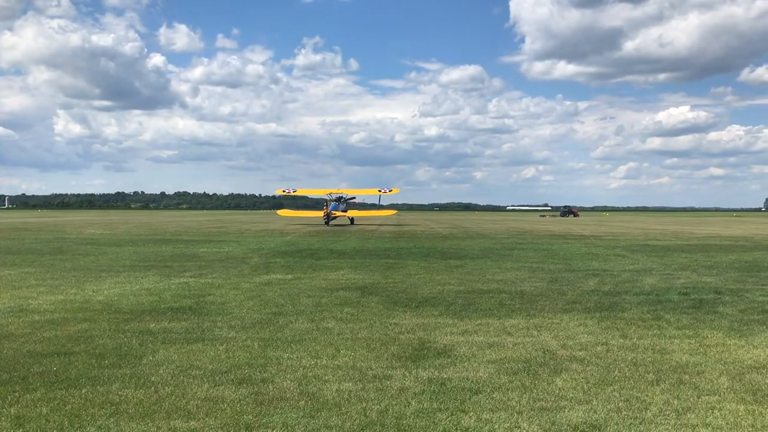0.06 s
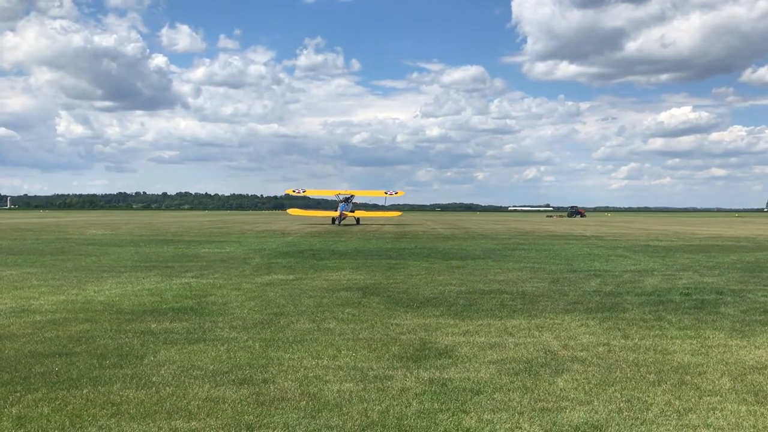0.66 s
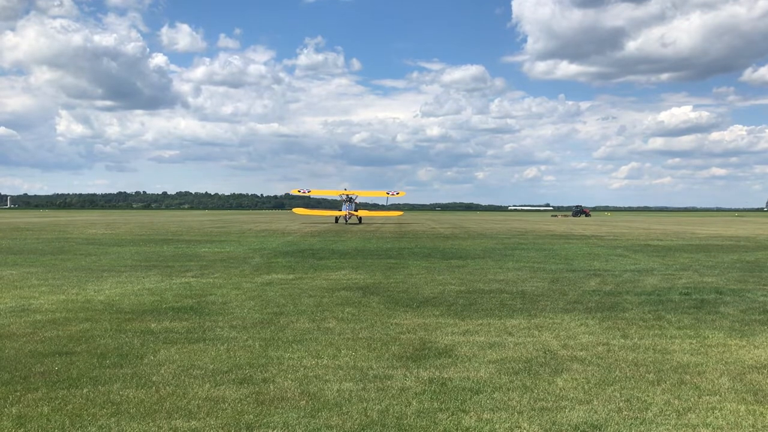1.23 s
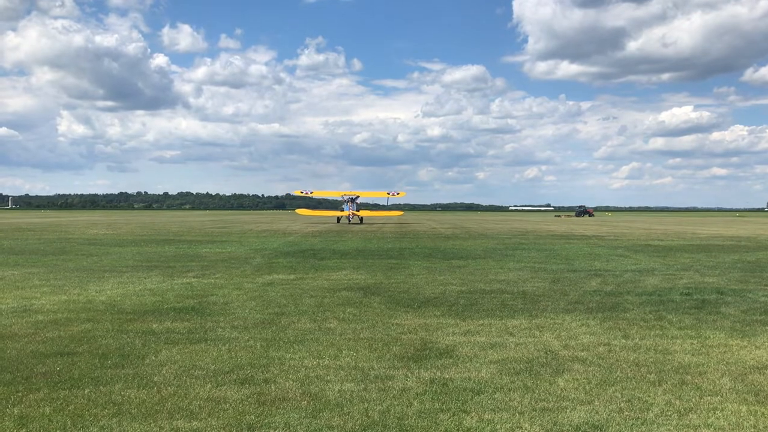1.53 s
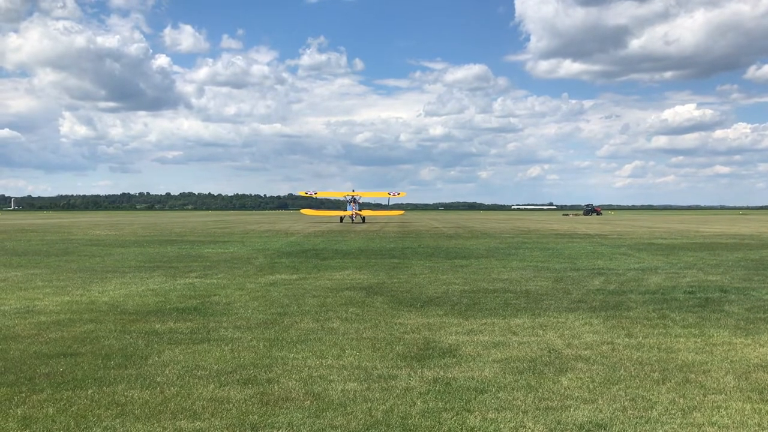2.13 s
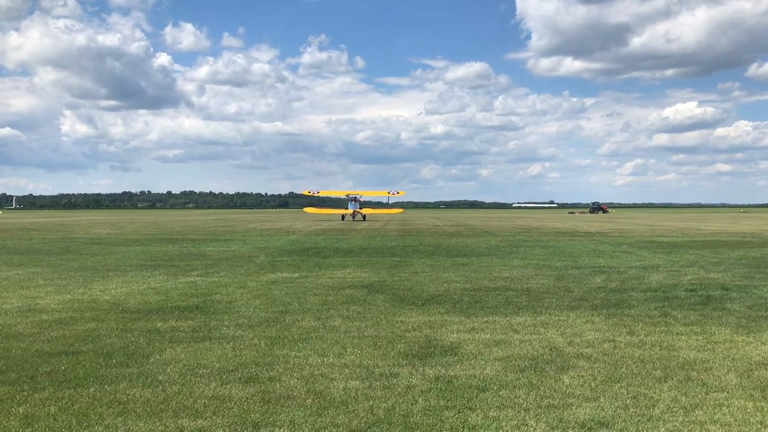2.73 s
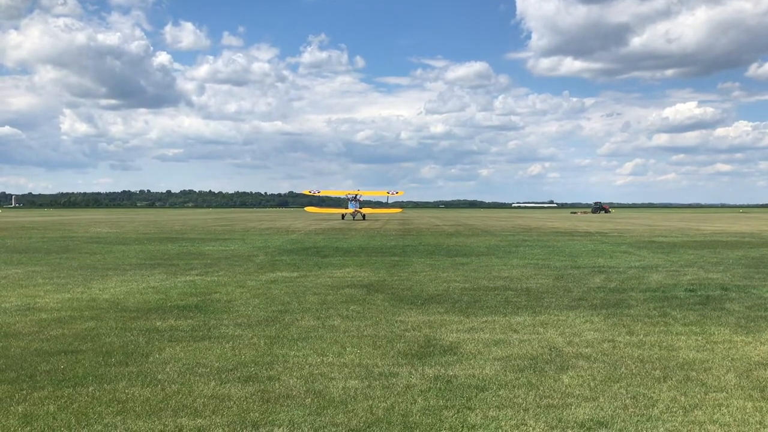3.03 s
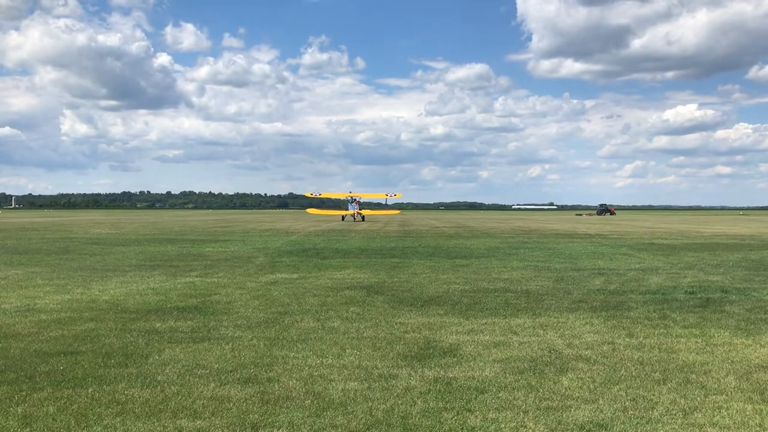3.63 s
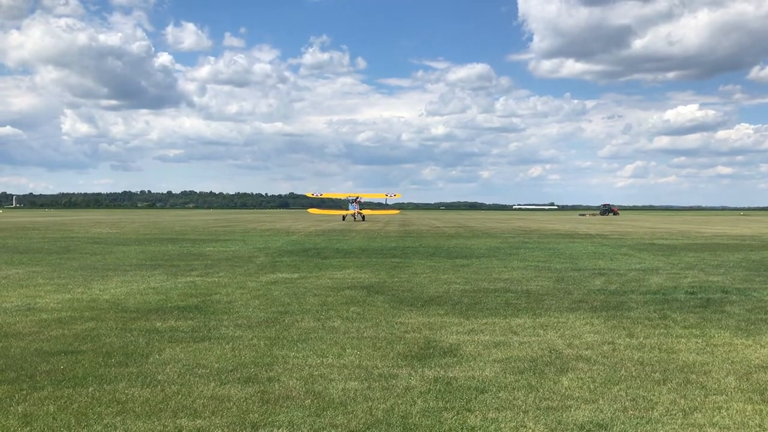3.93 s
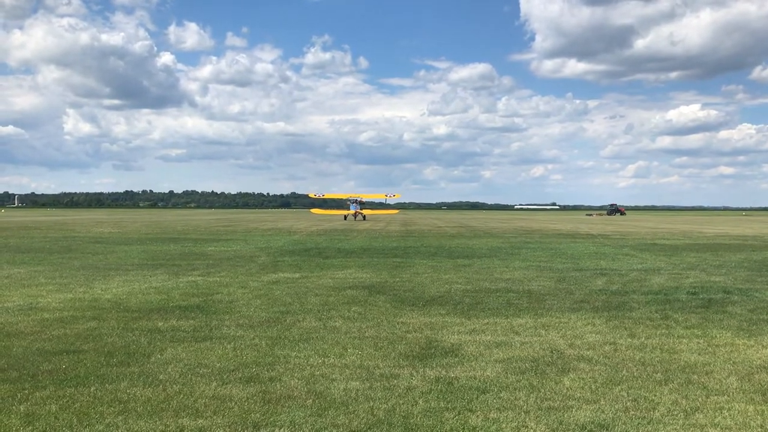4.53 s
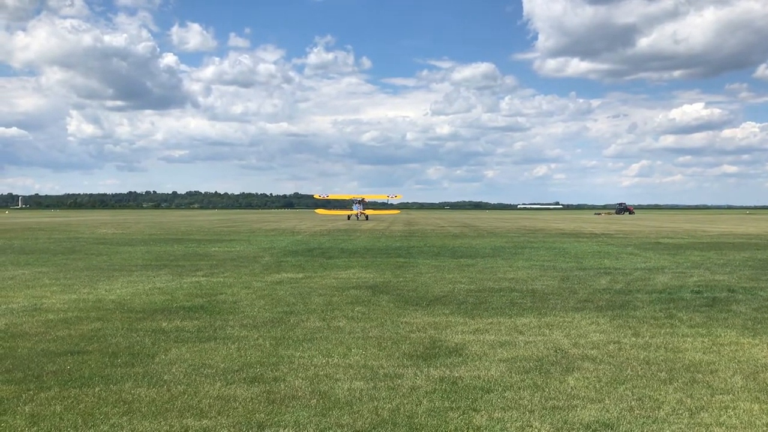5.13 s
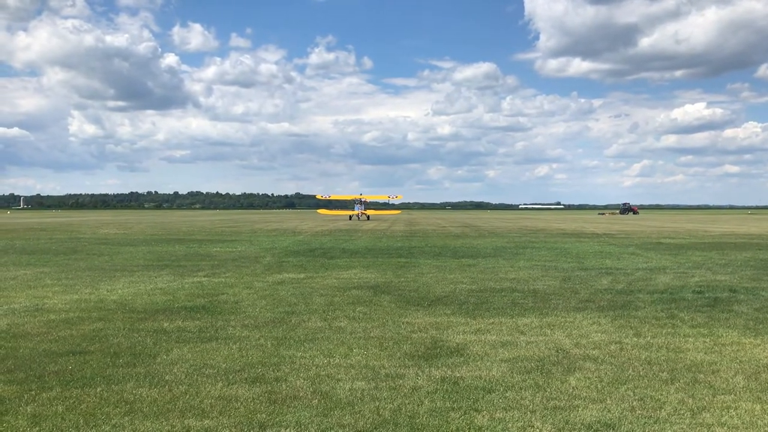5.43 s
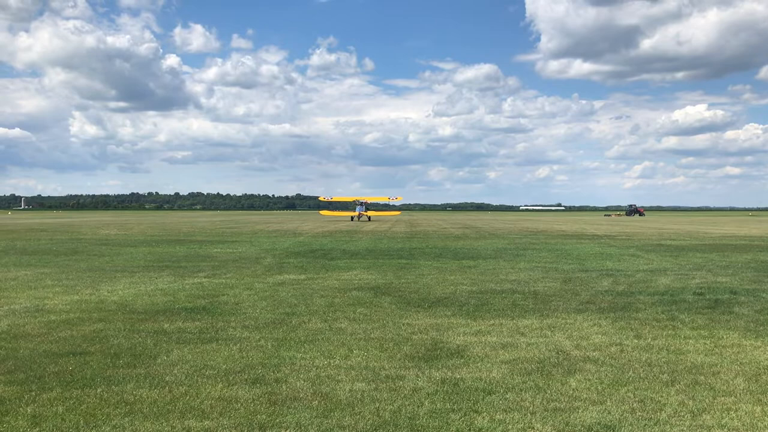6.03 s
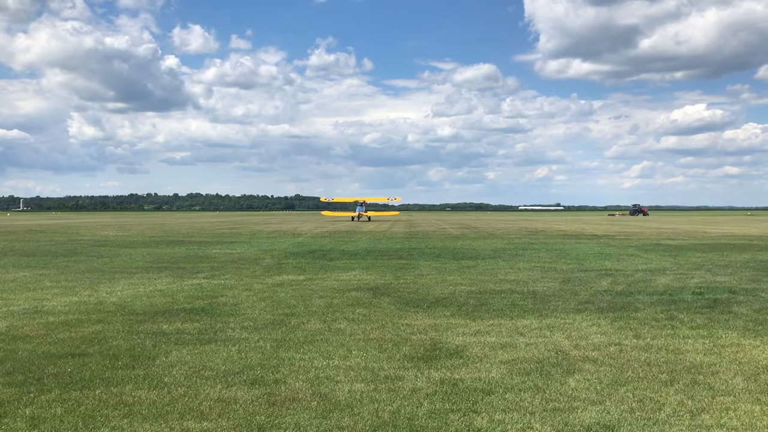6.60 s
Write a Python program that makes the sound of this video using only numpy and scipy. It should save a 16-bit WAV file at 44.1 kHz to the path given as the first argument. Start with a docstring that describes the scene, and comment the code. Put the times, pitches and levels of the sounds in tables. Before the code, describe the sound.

Gusty wind buffets the microphone throughout on an open grass airfield, shifting between low rumble, thumps and brief tearing flaps. Beneath it a distant biplane taxis at low power, its radial engine chuffing rapidly and unevenly with a low drone and propeller swish. A faint hollow wind note sinks and fades early on. Around the middle, the engine's rasp briefly swells and sweeps downward, then the engine slows slightly and dulls.

```python
"""Gusty wind buffets the microphone, over faint grass hiss and an early hollow note.
Under it a biplane taxis far off, its seven-cylinder radial ticking over near 1000 rpm.
Each cylinder chuffs with its own strength and pipe ring; now and then a hard burn cracks.
The propeller tips swish and the firing rate drones. Eddies sweeping the microphone port
cover most of the engine's bass."""
import sys
import numpy as np
from scipy import signal
from scipy.fft import rfft, irfft, next_fast_len
from scipy.io import wavfile
from scipy.ndimage import uniform_filter1d, minimum_filter1d

SR = 44100
rng = np.random.default_rng(int(sys.argv[2]) if len(sys.argv) > 2 else 0)


def bounce(signal):
    """Save signal as a 16-bit WAV file at the path given by the first command-line argument."""
    frames = np.transpose(np.atleast_2d(signal))
    limited = np.clip(frames, -1, 1)
    pcm = np.round(limited * 32767).astype(np.int16)
    wavfile.write(sys.argv[1], SR, pcm)


N = 302746
TIME_S = np.arange(N) / SR

# wind between gusts, eddy rate growing with speed: time_s, base_eddy_hz, rumble_db
BREEZE = [(0.0, 194, 3.5), (0.5, 237, -8.5), (0.97, 195, -9.5), (1.25, 201, 3.2), (1.65, 180, -6),
          (1.75, 133, 3), (2.2, 99, -0.8), (2.5, 121, 0.8), (2.92, 259, 1.8), (3.02, 149.0, -5.7),
          (3.3, 140, 5.5), (3.7, 142, 2), (4.27, 161.0, -3.8), (4.45, 60, 3.5), (4.66, 99, 3),
          (4.9, 179, 2.5), (6.3, 161.0, 1.8), (6.86, 266, -1.3)]
# gusts on top of the breeze: start_s, length_s, added_eddy_hz, added_rumble_db
GUSTS = [(-.015, 0.11, 382, -6), (0.168, 0.037, 99, 1), (.23, .077, 36, 2.5), (0.323, 0.05, 165, 5),
         (0.574, .12, 613, 5), (0.734, 0.018, 137, 3.5), (0.799, 0.15, 157, 6.5), (1.12, 0.029, 250, -1.5),
         (1.176, .02, 140, -6), (1.297, 0.16, 215, -0.5), (1.506, 0.14, 128, 2), (1.768, 0.031, 45, -5),
         (1.841, 0.048, 53, -2), (2.257, 0.15, 89.5, 1.8), (2.656, 0.19, 122, 0), (3.09, 0.036, 144, 0.5),
         (3.318, 0.22, 179, -8), (3.532, 0.12, 258, -8.5), (3.729, 0.025, 280, -2.5), (3.846, 0.18, 101, 2),
         (4.013, 0.036, 50, .5), (4.104, .064, 194, 3), (4.332, 0.064, 172, 5.5), (4.692, .036, 106, 4.5),
         (4.972, 0.17, 92, -0.5), (5.091, .12, 170, -8), (5.323, 0.028, 290, 1), (5.349, 0.083, 150, -2),
         (5.503, 0.11, 115, 1.3), (5.632, 0.079, 238, -4.5), (5.746, 0.11, 255, 0),
         (5.907, 0.07, 130, -1.5), (5.99, 0.12, 221, 0), (6.139, 0.14, 232, -3.3), (6.353, 0.12, 180, 1),
         (6.506, 0.12, 85, -.7), (6.584, 0.12, 126, -5)]
# hardest brief buffets: time_s, added_eddy_hz
BUFFETS = [(.034, 140), (0.046, 312), (0.181, 108), (.251, 115), (0.629, 252), (0.921, 226), (1.14, 200),
           (1.325, 100), (1.365, 160), (1.587, 100), (2.293, 132), (2.334, 85), (2.841, 95), (3.186, 99),
           (3.547, 120), (3.591, 221), (3.902, 204), (4.043, 218), (4.074, 181), (4.15, 121), (5.143, 485),
           (5.346, 368), (5.431, 150), (5.723, 110), (6.666, 171), (6.716, 115)]
# large thumping eddies: time_s, added_rumble_db
THUMPS = [(.758, 11.5), (.868, 0), (1.581, 11), (2.69, 5), (3.071, 17.5), (4.529, 11.5), (5.022, 11.5),
          (6.13, 15.5)]
# microphone port response to eddies: freq_hz, gain_db
PORT_RESPONSE = [(20, -64), (30, -77), (42, -46), (70, -43), (130, -44), (310, -41.5), (480, -43.5),
                 (620, -42), (900, -43.5), (1400, -44.5), (1900, -50.5), (2800, -54.5), (4000, -55.5)]
# grass hiss spectrum: freq_hz, relative_db
GRASS_SPECTRUM = [(1000, 14), (5000, -3), (9000, 0.5), (12000, -18), (15700, -11)]
# hollow note in the breeze: time_s, centre_hz, level_db
HOLLOW_NOTE = [(.1, 730, -52), (.25, 710, -41), (.5, 680, -42.5), (.8, 680, -49), (1.07, 615, -39),
               (1.3, 564, -53), (2, 540, -80)]
# crankshaft speed: time_s, speed_rpm
CRANK_SPEED = [(0, 1017.2), (.33, 1025.1), (1.31, 1027.75), (2.61, 1017.3), (2.94, 1029.1), (3.27, 1021.4),
               (3.59, 1026.1), (4.25, 1014.5), (4.9, 975.7), (5.88, 959), (6.21, 973.9), (6.86, 963.2)]
# cylinders in firing order: place_intervals, relative_db, rise_s, ring_hz, ring_db
CYLINDERS = [(0.02, -13, .0022, 6900, -4), (.86, -3, .0024, 5900, -2), (1.97, 0, .0016, 2400, -1),
             (3.05, -10, .0016, 8600, 5), (4.13, -10, .003, 4300, -2), (4.93, 0, .0016, 5900, 3),
             (6.1, -8, .0022, 6700, -3)]
# exhaust puff spectrum: freq_hz, relative_db
CHUFF_SPECTRUM = [(700, -17), (1600, 7), (2600, -4), (3700, -3.5), (4400, 0.5), (4900, -1.5), (5450, 3.5),
                  (7000, -1), (9300, -2), (10400, -6), (11200, -3.5), (13000, -9), (15700, -20)]
# propeller spectrum, rippled by ground reflection: freq_hz, relative_db
SWISH_SPECTRUM = [(300, 0), (830, -4), (1130, 4), (1350, -4), (1620, 5), (1880, -5), (2200, -1), (3100, -4),
                  (3700, -10), (4300, -9), (5000, -17), (8500, -20), (11000, -26), (15700, -34)]
# engine sound carried across the field: time_s, chuff_relative_db, swish_relative_db
ENGINE_CARRY = [(0, -55.5, -54.5), (.3, -60, -58), (1.1, -54, -55), (1.6, -61.5, -61.5), (1.92, -51.5, -54),
                (2.3, -58.5, -57.5), (2.75, -52, -47), (3.04, -47, -50), (3.2, -52, -44), (3.4, -52, -54.5),
                (3.7, -58, -55.5), (4, -59, -52.5), (4.25, -49, -53.5), (4.48, -58, -53), (4.64, -52, -52),
                (4.8, -58, -54.5), (5.55, -57.5, -56), (5.8, -50, -50), (6.2, -63.5, -60.5),
                (6.65, -55, -58), (6.86, -60, -63)]
# sinking band of engine rasp, a swell that ends as a dip: time_s, centre_hz, gain_db
RASP_SWEEP = [(2.6, 8000, 1), (2.88, 7500, 1), (2.98, 6800, 6.5), (3.08, 3600, 5.5), (3.17, 2650, 6),
              (3.26, 2070, 4), (3.4, 1700, 3), (3.6, 1620, -12)]
# firing drone: harmonic_number, rms_db
DRONE_HARMONICS = [(1, -45.5), (2, -41.5), (3, -46), (4, -57), (5, -69), (7, -69.5)]
# hard exhaust cracks: start_s, relative_db
CRACKS = [(.3223, -36.5), (.556, -34.5), (0.9074, -32.5), (1.0254, -32.5), (1.492, -36), (1.843, -29),
          (1.9579, -40.5), (2.196, -32), (2.7845, -26), (2.902, -37), (2.9674, -37), (3.486, -31),
          (5.533, -31.5), (5.7818, -29.5), (5.854, -28.5)]


def from_db(db):
    """Decibels to gain."""
    return 10 ** (np.asarray(db) / 20)


def unit_rms(x):
    """Scale to rms 1."""
    return x / np.sqrt(np.mean(x ** 2) + 1e-20)


def curves(rows):
    """Each column of a time table at every sample."""
    times_s, *columns = np.transpose(rows)
    return [np.interp(TIME_S, times_s, column) for column in columns]


def gain_at(spectrum, hz):
    """Gain of a spectrum table at hz."""
    freq_hz, db = np.transpose(spectrum)
    return from_db(np.interp(np.log(hz), np.log(freq_hz), db))


def noise(spectrum):
    """Coloured noise, rms 1."""
    size = next_fast_len(N)
    hz = np.maximum(np.arange(size // 2 + 1) * SR / size, 1)
    white = rfft(rng.standard_normal(size))
    return unit_rms(irfft(white * gain_at(spectrum, hz), size)[:N])


def drift(corner_hz):
    """Slow random wander, rms 1."""
    step, settle = 40, 2000
    pole = np.exp(-2 * np.pi * corner_hz * step / SR)
    white = rng.standard_normal(N // step + settle + 2)
    slow = signal.lfilter([1], [1, -2 * pole, pole * pole], white)[settle:]
    return np.interp(np.arange(N) / step, np.arange(len(slow)), unit_rms(slow))


def resonance(x, hz, width_hz=600):
    """Two-pole resonance, peak gain 1."""
    radius = np.exp(-np.pi * width_hz / SR)
    feedback = [1, -2 * radius * np.cos(2 * np.pi * hz / SR), radius ** 2]
    return signal.lfilter(np.array([1, 0, -1]) * (1 - radius ** 2) / 2, feedback, x)


def bumps(times_s, heights, width_s):
    """A bell-shaped swell at each time."""
    out = np.zeros(N)
    for time_s, height in zip(times_s, heights):
        a, b = np.searchsorted(TIME_S, [time_s - 4 * width_s, time_s + 4 * width_s])
        out[a:b] += height * np.exp(-((TIME_S[a:b] - time_s) / width_s) ** 2 / 2)
    return out


def bands(x, centres_hz):
    """Overlapping bands that sum to x."""
    size = next_fast_len(N)
    spectrum, hz = rfft(x, size), np.arange(size // 2 + 1) * SR / size
    return [irfft(spectrum * np.interp(hz, centres_hz, one), size)[:N] for one in np.eye(len(centres_hz))]


def gust(start_s, length_s, attack_s=0.013, release_s=0.013):
    """Gust envelope: quick rise, hold, exponential fall."""
    age_s = TIME_S - start_s
    return np.clip(age_s / attack_s, 0, 1) * np.exp(-np.clip((age_s - length_s) / release_s, 0, 30))


def airflow(buffet_s=0.0048, thump_s=0.013, flaps_per_s=20, flap_lift=0.29, flap_s=0.0026,
            steady_share=0.91, flutter_db=1.51):
    """Eddy rate and rumble at the microphone: breeze, gusts, buffets, thumps, light random flaps."""
    eddy_hz, rumble_db = curves(BREEZE)
    for start_s, length_s, added_hz, added_db in GUSTS:
        swell = gust(start_s, length_s)
        eddy_hz += added_hz * swell
        rumble_db += added_db * swell
    eddy_hz = np.maximum(eddy_hz + bumps(*np.transpose(BUFFETS), buffet_s), 40)
    rumble_db += bumps(*np.transpose(THUMPS), thump_s)
    flap_times_s = TIME_S[rng.random(N) < flaps_per_s / SR]
    flaps = bumps(flap_times_s, np.full(len(flap_times_s), flap_lift), flap_s)
    unsteady = (steady_share + np.minimum(flaps, flap_lift)) * from_db(flutter_db * drift(134))
    return eddy_hz * unsteady, rumble_db


def wind(lumpy_db=1.2, speed_power=0.52, usual_hz=250, rumble_hz=300):
    """Eddies sweep the port, dying off above the eddy rate: gusts turn rumble into a tearing flap."""
    eddy_hz, rumble_db = airflow()
    rumble = from_db(rumble_db)
    centres_hz = np.geomspace(20, 6000, 32)
    turbulence = rng.standard_normal(N) * np.sqrt(SR / 2)  # 0 dB per Hz
    out = np.zeros(N)
    for hz, eddies in zip(centres_hz[:-1], bands(turbulence, centres_hz)):
        bass_share = 1 / (1 + (hz / rumble_hz) ** 2)  # large eddies reach only the bass
        out += eddies * gain_at(PORT_RESPONSE, hz) * np.exp(-hz / eddy_hz) * rumble ** bass_share
    return out * (eddy_hz / usual_hz) ** speed_power * from_db(lumpy_db * drift(46))


def grass(level_db=-62.5):
    """Steady hiss of the breeze in the grass."""
    return from_db(level_db) * noise(GRASS_SPECTRUM)


def hollow_note(width_hz=110):
    """A narrow band of wind noise sinks in pitch and fades."""
    centre_hz, level_db = curves(HOLLOW_NOTE)
    phase = 2 * np.pi * np.cumsum(centre_hz) / SR
    return from_db(level_db) * (drift(width_hz / 2) * np.cos(phase) + drift(width_hz / 2) * np.sin(phase))


def exhaust(firings, uneven_db=1.4, jitter_s=0.00024, tail_ratio=1.48):
    """Each cylinder puffs once in two turns, never quite evenly, and rings the pipe; rms 1."""
    out, hiss = np.zeros(N), noise(CHUFF_SPECTRUM)
    for place, level_db, rise_s, ring_hz, ring_db in CYLINDERS:
        cycles = (firings - place) / len(CYLINDERS)
        nearest = np.round(cycles).astype(int)
        strength, lateness = rng.standard_normal((80, 2))[nearest + 1].T  # one draw per cycle
        since_s = (cycles - nearest) / (np.gradient(cycles) * SR) - jitter_s * lateness
        # valve opens fast, pipe empties slower
        age = since_s / (rise_s * np.where(since_s > 0, tail_ratio, 1))
        puff = hiss * np.exp(-np.sqrt(1 + age ** 2)) * from_db(level_db + uneven_db * strength)
        out += puff + from_db(ring_db) * resonance(puff, ring_hz)
    return unit_rms(out)


def propeller(flicker_db=2.96):
    """Blade tips drag a steady, slightly flickering swish through the air."""
    return noise(SWISH_SPECTRUM) * from_db(flicker_db * drift(44))


def drone(firings, waver_db=3):
    """Harmonics of the firing rate, wavering in the moving air."""
    out = np.zeros(N)
    for harmonic, rms_db in DRONE_HARMONICS:
        amplitude = np.sqrt(2) * from_db(rms_db + waver_db * drift(4))
        out += amplitude * np.sin(2 * np.pi * (harmonic * firings + rng.random()))
    return out


def air_path(x, fading_db=3.5, end_db_at_10khz=-7.5, sweep_log_width=0.25):
    """Turbulence fades each band separately; one band swells and sinks; the top dulls as the plane rolls."""
    centres_hz = np.geomspace(900, 15000, 32)
    sweep_hz, sweep_db = curves(RASP_SWEEP)
    tilt_db = end_db_at_10khz * np.linspace(-0.5, 1, N)
    out = np.zeros(N)
    for hz, band in zip(centres_hz, bands(x, centres_hz)):
        swell_db = sweep_db * np.exp(-(np.log(hz / sweep_hz) / sweep_log_width) ** 2)
        out += band * from_db(fading_db * drift(28) + swell_db + tilt_db * hz / 10000)
    return out


def cracks(gain_db=-9, width_s=0.0019, rise_s=0.0023, ring_hz=5550, ring_db=5):
    """A charge burns hard and cracks in the pipe."""
    start_s, relative_db = np.transpose(CRACKS)
    puffs = noise(CHUFF_SPECTRUM) * bumps(start_s + rise_s, from_db(relative_db + gain_db), width_s)
    return puffs + from_db(ring_db) * resonance(puffs, ring_hz)


def scene(start_firings=-0.43, chuff_gain_db=2.5, swish_gain_db=2.0):
    """Wind over the distant engine, mono."""
    speed_rpm, = curves(CRANK_SPEED)
    turns = np.cumsum(speed_rpm / 60) / SR
    firings = start_firings + turns * len(CYLINDERS) / 2  # four-stroke
    chuff_db, swish_db = curves(ENGINE_CARRY)
    pipes = from_db(chuff_db + chuff_gain_db) * exhaust(firings) + cracks()
    swish = from_db(swish_db + swish_gain_db) * propeller()
    biplane = air_path(pipes + swish) + drone(firings)
    return (biplane + wind() + hollow_note() + grass())[None]


def record(dry, low_cut_hz=33, ceiling=0.54, high_cut_hz=15800):
    """Bass cut, limiter on the strongest buffets, top cut."""
    dry = signal.sosfilt(signal.butter(5, low_cut_hz, "high", fs=SR, output="sos"), dry)
    held_peak = -minimum_filter1d(-abs(dry), size=200)
    envelope = uniform_filter1d(held_peak, size=200)
    limited = dry / (1 + (envelope / ceiling) ** 6) ** (1 / 6)
    return signal.sosfilt(signal.ellip(10, 0.1, 90, high_cut_hz, fs=SR, output="sos"), limited)


dry = scene()
out = record(dry)
bounce(out)
```